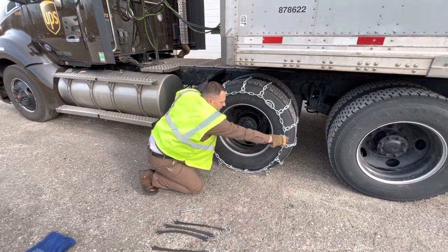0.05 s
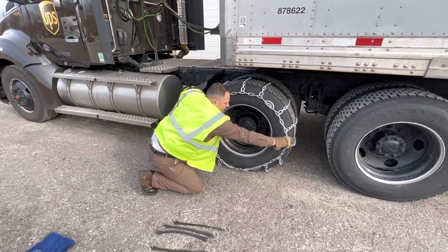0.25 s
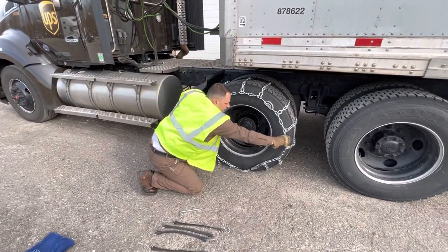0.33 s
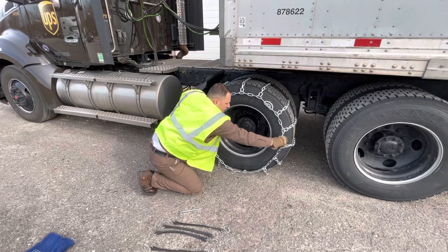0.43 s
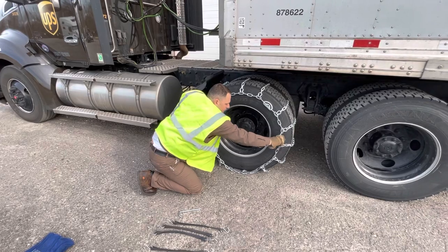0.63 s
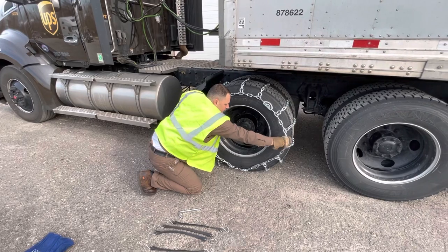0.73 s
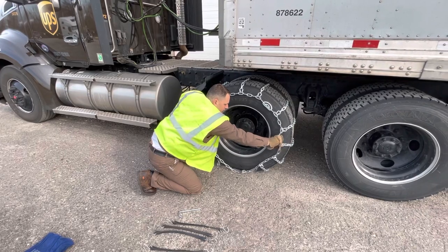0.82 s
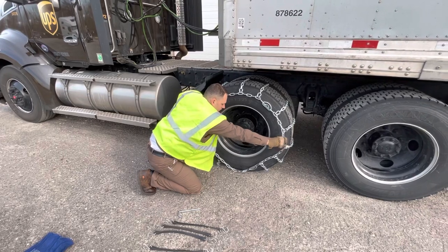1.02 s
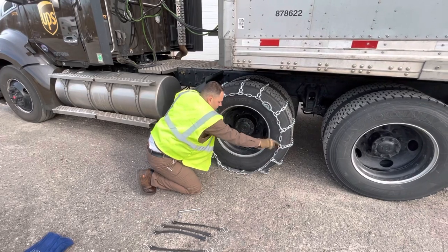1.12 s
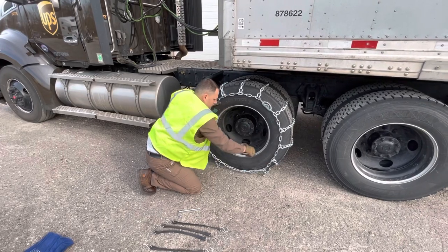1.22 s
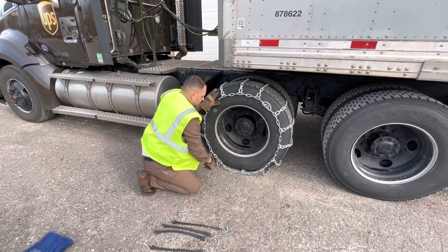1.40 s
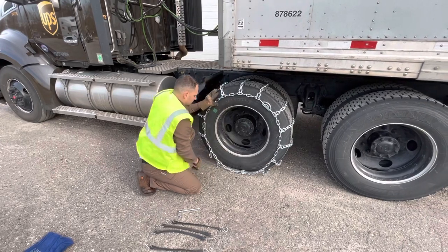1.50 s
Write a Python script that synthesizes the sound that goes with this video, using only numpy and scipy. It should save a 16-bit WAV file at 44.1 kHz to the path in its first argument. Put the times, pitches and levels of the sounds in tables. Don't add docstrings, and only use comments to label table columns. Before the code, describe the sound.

Steel snow chain handled on a truck tyre in an open yard. Almost quiet until 0.17 s, then bright, dry clinks, fine rattle and sharp ticks come in uneven flurries, with hollow rubber thuds beneath. Strong clashes fall near 0.55, 0.77 and 1.0 s; after 1.1 s only sparse light clinks remain, a small jingle at 1.33 s. Short echo off the truck, faint low traffic, phone a few metres away.

```python
import sys
import numpy as np
from scipy import signal
from scipy.fft import rfft, irfft
from scipy.io import wavfile
from scipy.ndimage import uniform_filter1d

SR = 44100
rng = np.random.default_rng(int(sys.argv[2]) if len(sys.argv) > 2 else 0)


def linear_from_db(decibels):
    return 10 ** (np.asarray(decibels, float) / 20)


def wav_out(sig):
    wavfile.write(sys.argv[1], SR, np.round(np.clip(np.atleast_2d(sig).T, -1, 1) * 32767).astype(np.int16))


N = 68355

# (frequency [Hz], level [dB])
LINK_MODES = [(7435, -8.5), (7740, -8), (8330, 1.5), (9070, -18), (9612, -3), (9780, 9.5), (10360, 7),
              (11050, 0), (11350, -8), (12900, -12)]
# (frequency [Hz], level [dB])
HOOK_MODES = [(3556, 11), (4580, 9.9), (5090, 5.8)]
# (frequency [Hz], level [dB])
THIN_MODES = [(14900, -11), (15200, -6), (15400, 0), (15490, -2), (15630, -3), (15800, -9)]
# (frequency [Hz], level [dB])
TYRE_TONE = [(59, -19), (100, -18), (231, -0.5), (372, 3.5), (422, -4), (751, -5), (1500, -27), (1950, -74),
             (3300, -120)]


def unit(x):
    return x / np.sqrt(np.mean(x ** 2))


def peak(x):
    return x / np.abs(x).max()


def colour(x, table):
    hz, db = np.array(table, float).T
    f = np.maximum(np.fft.rfftfreq(len(x), 1 / SR), 1)
    gain = linear_from_db(np.interp(np.log(f), np.log(hz), db))
    return irfft(rfft(x) * gain, len(x))


def ring(x, hz, t60):
    r = np.exp(-np.log(1000) / (t60 * SR))
    w = 2 * np.pi * hz / SR
    return signal.lfilter([np.sin(w)], [1, -2 * r * np.cos(w), r * r], x)


def add(out, t, x):
    i = int(t * SR)
    out[i:i + len(x)] += x[:N - i]


def contacts(length_s, chance, size=16):
    x = np.zeros(SR // 4)
    place = (np.arange(size) + chance[:size]) / size
    force = (chance[size:2 * size] - .5) * np.sin(np.pi * place ** 0.64)
    np.add.at(x, (place * length_s * SR).astype(int), force)
    return x


def yard():
    # (frequency [Hz], level [dB])
    yard_tone = [(20, -32), (60, -2.5), (130, 2.5), (600, -3.5), (1000, -13.5), (2260, -27), (11400, -36.5),
                 (15800, -41)]
    swell_db = 0.5 * uniform_filter1d(np.repeat(rng.standard_normal(N // 4000 + 1), 4000), 4000)[:N]
    return linear_from_db(-55 + swell_db) * unit(colour(rng.standard_normal(N), yard_tone))


def thuds():
    # (time [s], peak level [dB], pitch [Hz], length [s], brightness [dB])
    slap_events = [(0.169, -39.5, 392, .01, -7), (0.179, -40.5, 291, 0.015, -3),
                   (0.205, -43.5, 319, 0.011, -1), (0.3, -39, 306, .015, 6),
                   (0.317, -28.5, 281, 0.013, -2.5), (0.389, -38.5, 290.4, 0.016, -5),
                   (0.425, -36.5, 232, .02, -7), (0.549, -34.5, 407, .02, 12),
                   (0.566, -36.5, 224, 0.0096, 2.5), (.631, -40.5, 432, 0.008645, 3),
                   (.651, -30.5, 291.5, .014, -10), (0.704, -46, 306, 0.011, -11),
                   (.755, -32.5, 300, 0.01234, 10), (0.767, -29.5, 383.7, 0.0057, -8),
                   (0.853, -33.5, 263.3, 0.016, -6.5), (0.92, -42.5, 308.2, 0.023, -1),
                   (0.992, -44.5, 318, 0.01196, 9), (1.01, -31, 274.7, .012, -0.5),
                   (1.284, -47, 320, 0.0074, 18)]
    # (ratio to the slap pitch [1], level [dB], share of the ring time [1])
    wall_modes = [(1, 2.5, 0.86), (0.77, -7, 0.61), (1.3, -8, 1.5)]
    # (frequency [Hz], level [dB], fade time by 60 dB [s])
    cavity_modes = [(530.4, -5, 0.053), (756, -5.5, 0.058)]
    # (time [s], peak level [dB], frequency [Hz], fade time by 60 dB [s])
    lone_tap = (.057, -52, 1003, 0.022)
    wall_t60_s, slap_db, slap_fade_s, slap_rise_s = .15, -5.5, 0.01, 0.002
    out, tau = np.zeros(N), np.arange(SR // 4) / SR
    slap_shape = np.exp(-tau / slap_fade_s) * (1 - np.exp(-tau / slap_rise_s))
    chances = rng.random((len(slap_events), len(wall_modes) + len(cavity_modes), 32))
    for (t, db, hz, length, bright_db), chance in zip(slap_events, chances):
        modes = [(hz * ratio, g, wall_t60_s * share) for ratio, g, share in wall_modes]
        shift = 0.968 + 0.079 * chance[0, 31]
        modes += [(f * shift, g + bright_db, t60) for f, g, t60 in cavity_modes]
        body = 0
        for row, (f, g, t60) in zip(chance, modes):
            body = body + linear_from_db(g) * peak(ring(contacts(length, row, size=6), f, t60))
        slap = colour(rng.standard_normal(len(tau)) * slap_shape, TYRE_TONE)
        add(out, t, linear_from_db(db) * (peak(body) + linear_from_db(slap_db + bright_db / 2) * peak(slap)))
    tap_s, tap_db, tap_hz, tap_t60 = lone_tap
    add(out, tap_s, linear_from_db(tap_db) * ring(1. * (tau == 0), tap_hz, tap_t60))
    return signal.sosfilt(signal.butter(3, [150, 1500], "bandpass", fs=SR, output="sos"), out)


def shaking_effort():
    # (time [s], level [dB])
    shake_points = [(0, -134), (.16, -83), (0.188, -60), (0.271, -63), (.33, -52.5), (.41, -58.5),
                    (0.443, -51), (0.488, -66), (0.568, -52), (0.701, -60), (0.779, -51), (.86, -56.5),
                    (0.983, -63.5), (1.01, -45), (1.089, -56.5), (1.16, -78.5), (1.341, -68.5), (1.45, -85)]
    clump_db, clumps_per_s = 2.5, 110
    effort = linear_from_db(np.interp(np.arange(N) / SR, *np.array(shake_points).T))
    step = int(SR / clumps_per_s)
    clumps = np.repeat(rng.standard_normal(N // 200), step)[:N]
    return effort * linear_from_db(clump_db * uniform_filter1d(clumps, step // 2))


def random_hits(effort, per_s):
    moment, strength = rng.random((2, N))
    spread_db = 2.5
    return effort * (moment < per_s / SR) * linear_from_db(-spread_db * np.log(np.maximum(strength, .04)))


def rattle():
    # (frequency [Hz], level [dB])
    tick_tone = [(1000, -10.5), (2000, -7.5), (3500, -1), (6500, 1), (10000, 4.5), (13000, 2), (14200, -7),
                 (15400, -6.5)]
    hits_per_s, grit_s, detune = 1300, 0.0029, 0.0044
    loose_t60_s, jingle_t60_s, jingle_db = 0.02, 0.021, -4
    ring_db, tick_db, rub_db = 3.5, 7.5, 1
    effort = shaking_effort()

    modes = LINK_MODES + [(f, db - 5) for f, db in HOOK_MODES] + [(f, db + 1) for f, db in THIN_MODES]
    rings = np.zeros(N)
    for f, db in modes:
        for k in (-1, 0, 1):
            hits = random_hits(effort, hits_per_s / 20)
            rings += linear_from_db(db) * ring(hits, f * (1 + detune * k), loose_t60_s)

    grit_fade = np.exp(-np.arange(400) / SR / grit_s)
    grit = np.convolve(random_hits(effort, hits_per_s), grit_fade)[:N] * rng.standard_normal(N)
    jingle = np.zeros(N)
    for f in 2600 * 6 ** rng.random(size=48):
        jingle += ring(random_hits(effort, hits_per_s / 40), f, jingle_t60_s)
    ticks = unit(colour(grit, tick_tone)) + linear_from_db(jingle_db) * unit(colour(jingle, tick_tone))

    rub = colour(effort * rng.standard_normal(N), TYRE_TONE)
    mix = linear_from_db(ring_db) * unit(rings) + linear_from_db(tick_db) * unit(ticks) + linear_from_db(rub_db) * unit(rub)
    return np.sqrt(np.mean(effort ** 2)) * mix


def cracks():
    # (time [s], peak level [dB], centre [Hz])
    crack_events = [(0.0325, -56, 8300), (.066, -58.5, 5970), (.1277, -64.5, 7560), (0.1739, -53, 7600),
                    (0.184, -48.5, 6850), (0.1962, -42.5, 3860), (0.2243, -44.5, 5100), (.306, -42.5, 8000),
                    (.321, -41, 9000), (0.333, -39, 11000), (.382, -36.5, 6100), (0.4217, -39.5, 6030),
                    (0.5305, -53, 2580), (0.561, -45.5, 2600), (.6055, -47.5, 5130), (.733, -38.5, 10050),
                    (0.7434, -48, 2890), (0.7696, -38, 5050), (.842, -40, 7860), (.863, -45, 5920),
                    (1.006, -34, 9200), (1.1076, -50, 7000), (1.181, -51, 7900), (1.192, -54, 5200),
                    (1.2276, -52, 9200), (1.263, -59.5, 5000), (1.2892, -54, 4740), (1.323, -54.5, 2880),
                    (.975, -55, 3060), (.625, -49, 5000), (.655, -45.5, 4940)]
    boost_db, fade_s = 4.5, 0.0024
    out, tau = np.zeros(N), np.arange(2048) / SR
    for t, db, hz in crack_events:
        noise = rng.standard_normal(len(tau))
        band = colour(noise, [(hz / 4, -24), (hz, 0), (hz * 4, -24)])
        add(out, t, linear_from_db(db + boost_db) * unit(band) * np.exp(-tau / fade_s))
    return out


def flurries(events, modes, t60):
    focus_db_per_octave, scatter_db, detune, choked_t60_s = 32.5, 6, 0.0044, 0.023
    lone_db_per_s = 208
    out, tau = np.zeros(N), np.arange(SR // 4) / SR
    chances = rng.random((len(events), len(modes), 2, 34))
    for (t, db, hz, length, free), rows in zip(events, chances):
        own = min((f for f, _ in modes), key=lambda f: abs(f - hz))
        lone_db = lone_db_per_s * free
        x = 0
        for (f, mode_db), pair in zip(modes, rows):
            away_db = focus_db_per_octave * abs(np.log2(f / own)) + (f != own) * lone_db
            for part, chance in enumerate(pair):
                share = 1 if part == 0 else .5 * linear_from_db(-lone_db)
                gain = share * linear_from_db(.5 * mode_db - away_db + scatter_db * (2 * chance[32] - 1))
                pitch = f * (1 + detune * (2 * chance[33] - 1))
                if f == own and part == 0:
                    pitch = hz
                x = x + gain * peak(ring(contacts(length, chance), pitch, t60))
        choke_db = -60 * np.maximum(tau - free, 0) / choked_t60_s
        add(out, t, linear_from_db(db + choke_db) * peak(x))
    return out


def tinkles():
    # (time [s], peak level [dB], strongest mode [Hz], length of contacts [s], rings freely for [s])
    tinkle_events = [(.225, -43, 15000, .015, .07), (.355, -39, 15070, .02, .03),
                     (.377, -25.5, 15400, .01, 0.018), (.436, -30, 15000, .018, 0.057),
                     (.605, -44, 15600, .02, .04), (.675, -45, 14900, .006, 0.1),
                     (.68, -43, 15440, .03, 0.064), (.89, -47.5, 15340, .04, .06),
                     (.945, -37, 15180, .03, .06), (1.02, -46.5, 15700, .03, 0.072),
                     (1.07, -36.5, 15600, .04, 0.063), (1.13, -54, 15500, .03, 0.066),
                     (1.325, -65, 15170, .01, .06)]
    return flurries(tinkle_events, THIN_MODES, t60=.14)


def knocks():
    # (time [s], peak level [dB], strongest mode [Hz], length of contacts [s], rings freely for [s])
    knock_events = [(.185, -42, 3810, .003, 0.005), (.225, -44.5, 5090, .006, 0.0073),
                    (.26, -53, 5090, 0.0043, 0.0223), (.32, -45, 4580, 0.014, 0.0157),
                    (.38, -37.5, 5090, .006, 0.0117), (.42, -45, 3550, 0.0082, 0.016),
                    (.485, -68, 5090, 0.009, 0.03), (.512, -46.5, 5070, .03, 0.051),
                    (.51, -49, 3550, .02, 0.0545), (.57, -36, 4580, .01, 0.0082),
                    (.606, -40, 5100, 0.0136, 0.0171), (.675, -46, 5090, 0.0072, 0.1),
                    (.68, -47, 4580, 0.0058, 0.027), (.776, -38.5, 3550, 0.0076, 0.03),
                    (.932, -46, 4580, .006, 0.011), (.945, -45.5, 5085, .012, 0.066),
                    (1.003, -40, 5090, .008, 0.0174), (1.008, -43.5, 3550, 0.033, 0.069),
                    (1.03, -46.5, 5090, 0.04, 0.065), (1.192, -54, 5075, 0.0046, 0.026),
                    (1.252, -63, 4570, .004, 0.045), (1.325, -49.5, 3548, 0.018, 0.044),
                    (1.34, -56, 5080, 0.035, 0.052)]
    return flurries(knock_events, HOOK_MODES, t60=.55)


def clinks():
    # (time [s], peak level [dB], strongest mode [Hz], length of contacts [s], rings freely for [s])
    clink_events = [(.223, -24.5, 9780, 0.0088, 0.012), (.225, -49, 12900, 0.005, 0.079),
                    (.237, -32, 9780, 0.0074, 0.0093), (.26, -41, 8330, .01, 0.023),
                    (.283, -34, 9780, .005, 0.01), (.306, -31, 8300, .001, 0.00245),
                    (.32, -29, 10100, 0.00405, 0.0058), (.333, -31.5, 10300, 0.0049, 0.0173),
                    (.349, -30, 8330, 0.0084, .013), (.352, -36, 10000, .012, .02),
                    (.445, -32.5, 9840, 0.0095, 0.0152), (.487, -40.5, 10400, .008, 0.039),
                    (.531, -32.5, 9780, 0.00304, 0.0089), (.543, -22.5, 9720, .016, 0.013),
                    (.563, -24.5, 9900, .008, 0.0169), (.574, -36, 10400, 0.0065, 0.0058),
                    (.604, -32, 8420, .01, .022), (.62, -38, 9800, 0.0074, 0.012),
                    (.673, -29, 10400, 0.014, 0.0078), (.682, -38.5, 12850, 0.00282, 0.025),
                    (.705, -34, 10000, 0.0095, 0.0045), (.715, -33.5, 9720, .004, 0.0055),
                    (.733, -32, 10300, 0.0025, 0.0021), (.744, -30.5, 9720, 0.0074, 0.056),
                    (.757, -33, 7750, .02, 0.046), (.768, -17, 10360, .024, 0.023),
                    (.932, -37, 10100, 0.028, 0.013), (.978, -32, 8320, 0.016, 0.022),
                    (1.005, -18.5, 9790, 0.011, 0.015), (1.012, -21.5, 8340, 0.011, 0.03),
                    (1.024, -21, 10400, 0.015, 0.018), (1.072, -32, 8280, .014, 0.0334),
                    (1.126, -41, 9720, .01, 0.029), (1.18, -52, 9400, .002, 0.0085),
                    (1.192, -41, 9950, 0.0032, 0.013), (1.223, -47.5, 8330, 0.0028, .1),
                    (1.287, -42, 8310, .004, 0.0246), (1.325, -40.5, 8310, .014, .12),
                    (1.331, -39.5, 9800, 0.0099, 0.015), (1.33, -54, 13000, .005, 0.091)]
    return flurries(clink_events, LINK_MODES, t60=.16)


def scene():
    echo_db, echo_t60_s = -9, 0.11
    near = thuds() + rattle() + cracks() + tinkles() + knocks() + clinks()
    tau = np.arange(SR // 4) / SR
    echo = rng.standard_normal(len(tau)) * linear_from_db(-60 * tau / echo_t60_s)
    wet = signal.fftconvolve(near, echo / np.sqrt(np.sum(echo ** 2)))[:N]
    return (near + linear_from_db(echo_db) * wet + yard())[None]


def roll_off(x):
    return signal.sosfilt(signal.butter(12, 16860, fs=SR, output="sos"), x)


def record(dry):
    top_hz = 15900
    low_pass = signal.ellip(8, .2, 60, top_hz, fs=SR, output="sos")
    return roll_off(signal.sosfilt(low_pass, dry))


dry = scene()
out = record(dry)
wav_out(out)
```